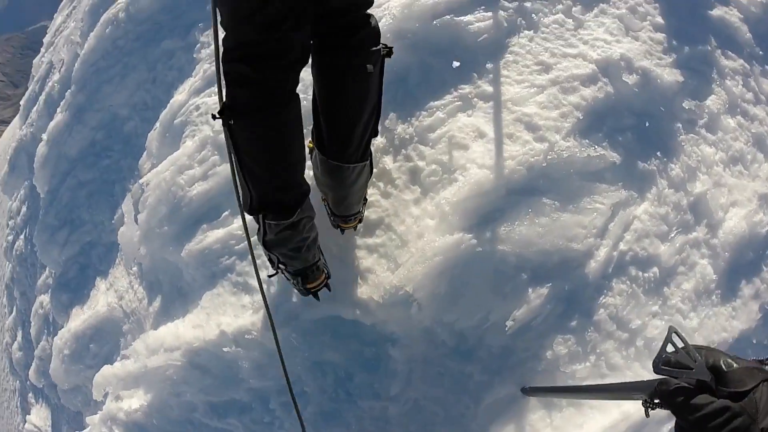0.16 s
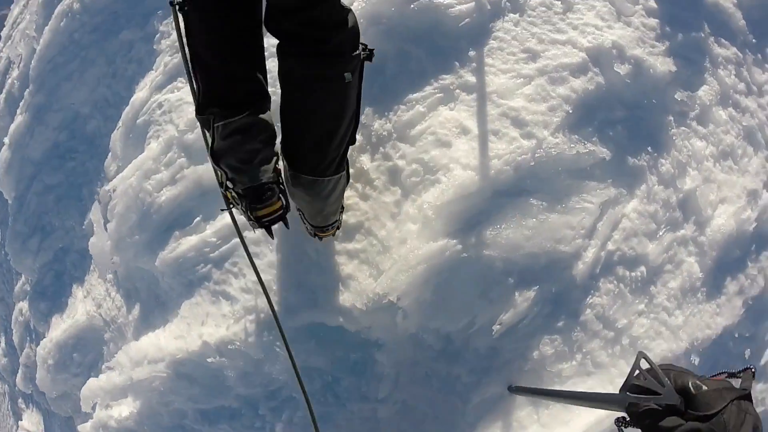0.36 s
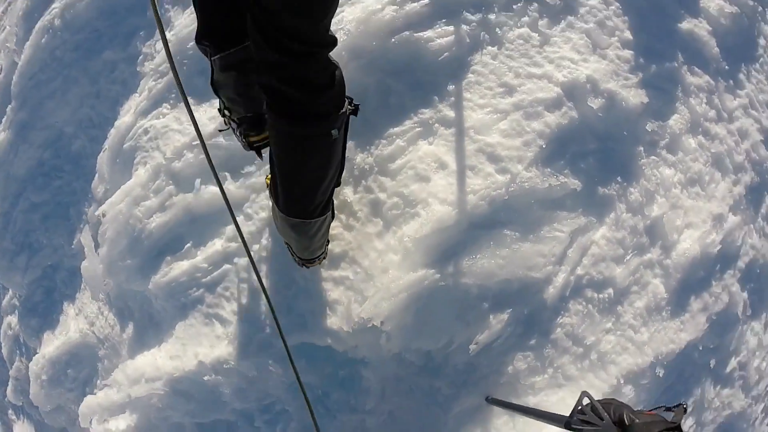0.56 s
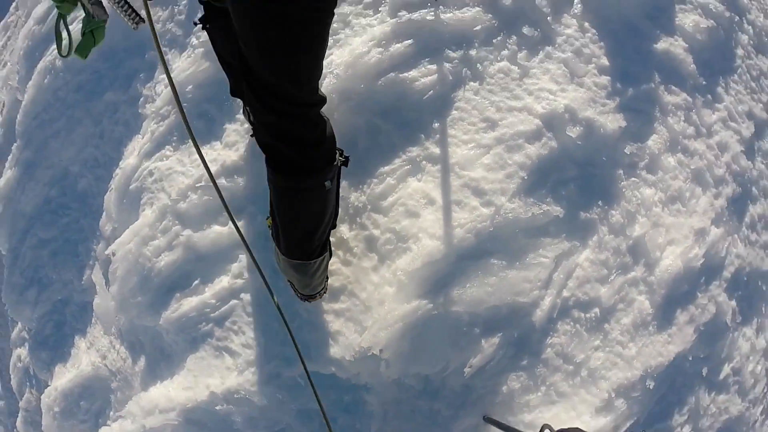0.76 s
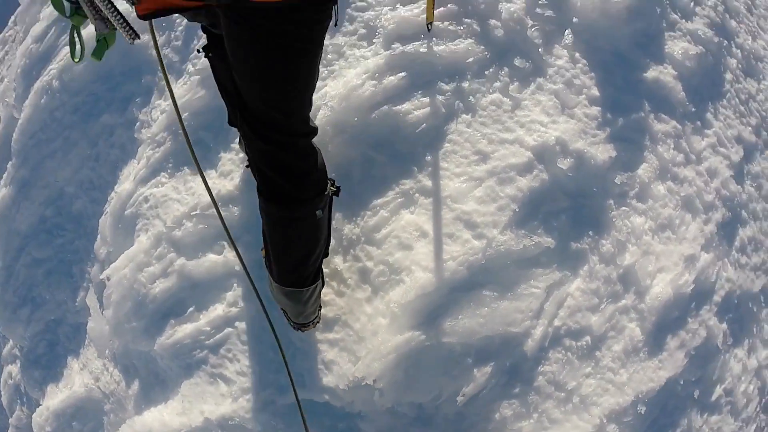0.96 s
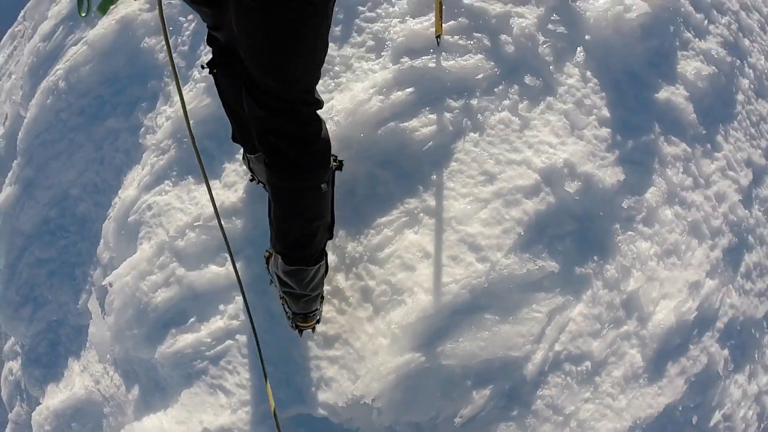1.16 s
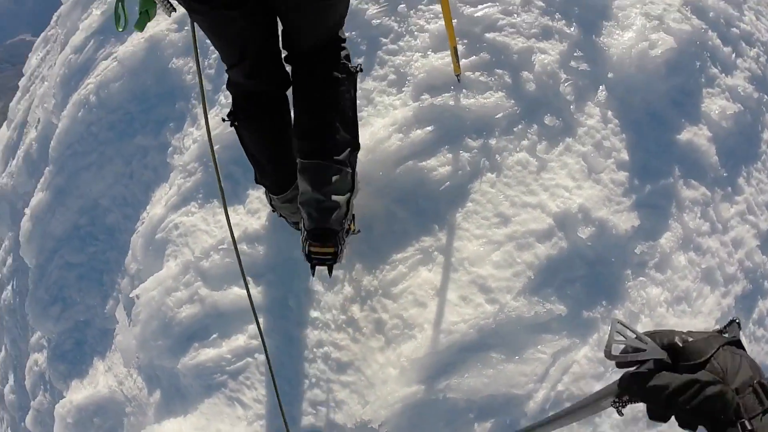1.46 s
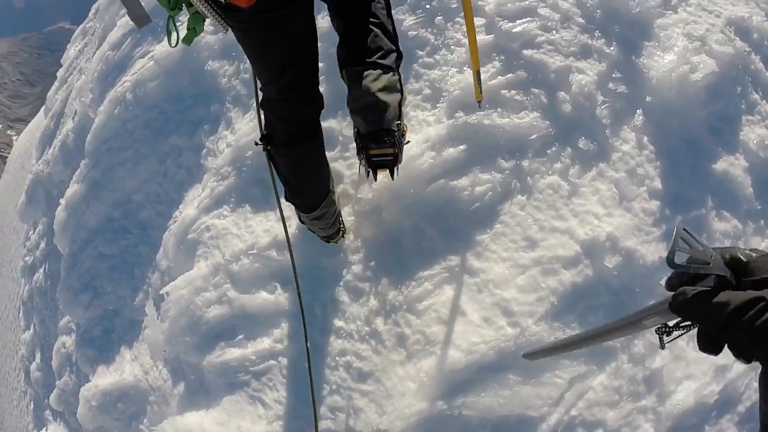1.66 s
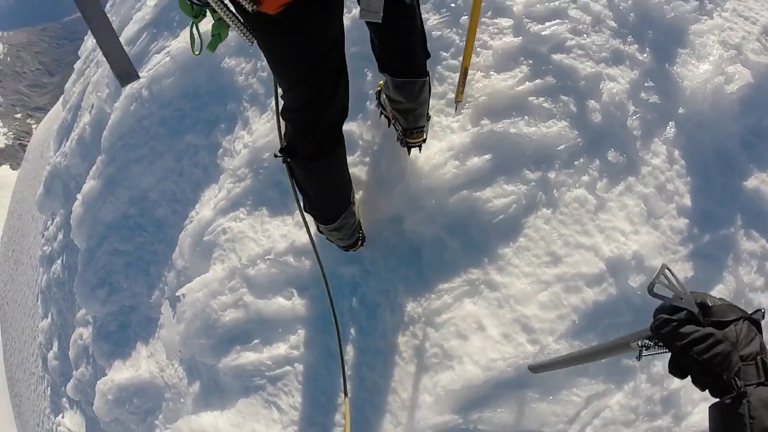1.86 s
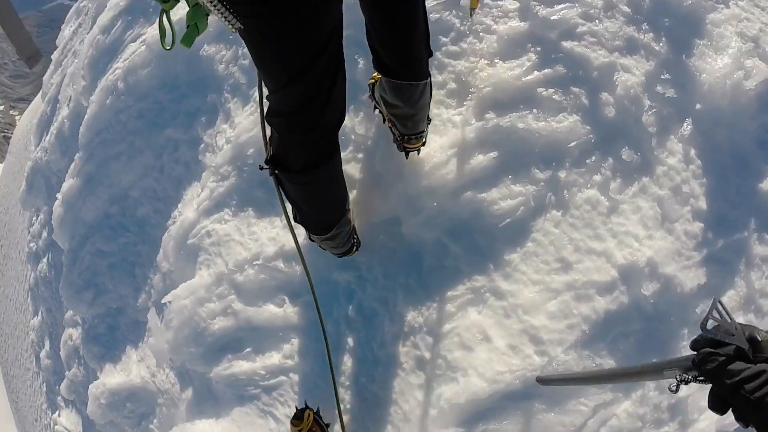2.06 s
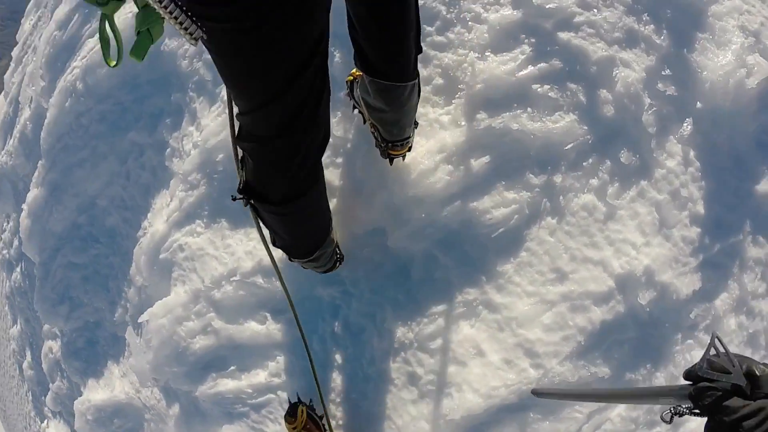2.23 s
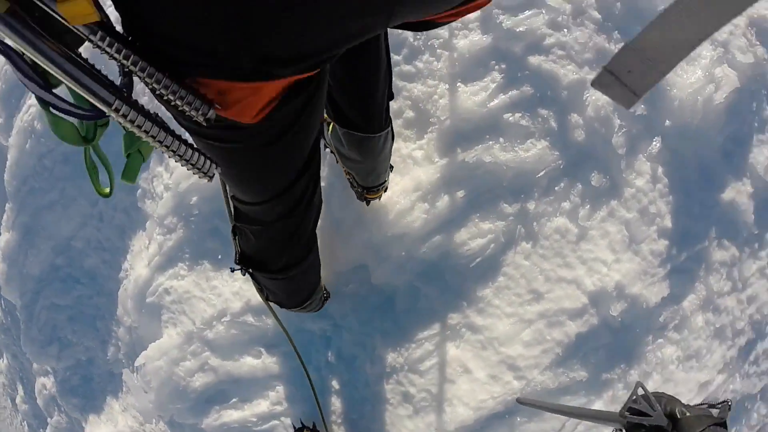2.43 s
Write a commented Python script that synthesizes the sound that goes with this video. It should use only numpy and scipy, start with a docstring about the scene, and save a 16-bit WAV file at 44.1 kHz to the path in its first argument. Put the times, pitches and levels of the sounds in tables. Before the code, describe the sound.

Dense, grainy snow crunches and brittle crust snaps lead, over uneven bassy wind buffets; tiny metal pings come midway, gear clinks near the end, then short rising scrapes. Outdoors and dry, one-channel, from a body-worn microphone in a housing.

```python
"""Crusted snow crushes underfoot in dense grains, at once and then step after step, with sharp snaps of the crust.
Climbers in crampons walk on a windy ridge, heard through a closed camera housing.
Crushes and scrapes are random grain trains, dry or filtered by resonances; snaps are noise bursts with a ring.
Metal gear clinks, knocks and pings as sums of damped modes.
Wind is coloured noise, with low thumps made by a wavering sine under bell-shaped swells."""
import sys
import numpy as np
from scipy import signal
from scipy.fft import rfft, irfft
from scipy.io import wavfile

SR = 44100
rng = np.random.default_rng(int(sys.argv[2]) if len(sys.argv) > 2 else 0)


def to_linear_factor(level_db):
    """Convert decibel levels (scalar or array-like) to linear amplitude factors."""
    exponent = np.asarray(level_db, float) / 20
    return 10 ** exponent


def wrap_up_sound(samples):
    """Save the sound to the file named by the first command line argument, as 16-bit audio."""
    columns = np.atleast_2d(samples).T
    # keep every value between -1 and 1, then stretch to whole-number steps
    tamed = np.clip(columns, -1, 1)
    steps = np.round(tamed * 32767).astype(np.int16)
    wavfile.write(sys.argv[1], SR, steps)


N = 114660  # samples, 2.6 s

# Spectral density of the steady wind: f/Hz, relative level/dB
RUMBLE_SPECTRUM = [(12, 1), (20, -11), (43, 4), (65, -0.5), (80, -2.5), (140, -32), (180, -78), (310, -120)]
# Slow swing of the steady wind: t/s, gain/dB
GUST_SWING = [(0, -5.5), (.7, 4.5), (1.05, -1.5), (1.9, -1), (2.15, -3.5), (2.6, 0)]
RUMBLE_DB, RUMBLE_LUMPY_DB, RUMBLE_LUMP_HZ = -41, 1, 11.0  # level, rms of its drift, drift corner

# Level of the low wind and rustle: t/s, level/dB
RUSTLE_LEVEL = [(0.0, -80), (0.03, -53), (0.17, -62), (0.28, -51), (.47, -52.5), (.52, -46.5), (.56, -51),
                (1.03, -54), (1.09, -58.5), (1.14, -50), (1.17, -59), (1.27, -46), (1.4, -53),
                (2.21, -57.5), (2.24, -51.5), (2.41, -63.5), (2.43, -50.5), (2.57, -51.5), (2.6, -80)]
# Spectral density of the low wind and rustle: f/Hz, relative level/dB
RUSTLE_SPECTRUM = [(71, -44), (120, -1), (151, -8.5), (194, -9), (242, -12), (700, -22.5), (910, -53),
                   (1540, -120)]
RUSTLE_LUMPY_DB, RUSTLE_LUMP_HZ = 2.5, 21.0

# Wind buffets: centre t/s, level/dB, f/Hz, full width at half amplitude/s
BUFFETS = [(.068, -30, 50.4, 0.018), (0.157, -25.5, 50.4, 0.012), (0.199, -30, 47.8, 0.045),
           (0.254, -10, 58.5, 0.031), (.29, -22.5, 57.4, 0.025), (0.322, -14.5, 61.9, 0.036),
           (.374, -5.5, 57, 0.02), (.399, -16.5, 45.8, 0.032), (0.432, -15, 59, 0.036),
           (0.461, -12.5, 59.7, 0.03), (0.536, -24, 53, 0.021), (.585, -34.5, 42.4, 0.021),
           (0.661, -25, 49.7, 0.05), (0.699, -19, 42.8, 0.016), (0.731, -23, 46.7, 0.012),
           (0.814, -27.5, 55, 0.026), (0.855, -19, 57.4, 0.011), (.89, -16, 73.2, 0.044),
           (.915, -18, 66.9, 0.058), (0.943, -10.5, 57, 0.04), (0.989, -20.5, 62, 0.02),
           (1.133, -13, 40.6, 0.027), (1.186, -23.5, 48.3, 0.022), (1.232, -33.5, 50.7, 0.04),
           (1.441, -18, 59.9, 0.027), (1.516, -29, 63.2, 0.04), (1.635, -24, 57.7, 0.024),
           (1.814, -23, 57.7, 0.023), (1.865, -32.5, 51.74, 0.038), (1.948, -32, 44.96, 0.064),
           (2.233, -16.5, 60.05, 0.018), (2.258, -31.5, 67.5, 0.033), (2.299, -22, 63, 0.023),
           (2.321, -22.5, 50, 0.025), (2.369, -24.5, 55.4, 0.014), (2.455, -27, 48.3, 0.022)]
BUFFET_ROUGHNESS, BUFFET_CUT_HZ = 0.26, 98  # noise rms beside a sine of height 1; low-pass edge

# Metal gear knocking: t/s, level/dB
CLINKS = [(1.926, -42.5), (1.942, -44), (1.9632, -32), (1.975, -43.5), (1.994, -38)]
# Modes of the gear: f/Hz, relative level/dB, decay by 60 dB/s
GEAR_MODES = [(1600, -6, .025), (2555, -14, .04), (3012, 0, .095), (3965, -1, .03), (4360, -5, .08),
              (5705, -10, .11), (6590, -13, .03), (8480, -11, .018), (11290, -12, .018)]
GEAR_SCATTER_DB = 1.5
CHATTER_S, CHATTER_PER_S = 0.005, 500  # decay by 1/e, mean rate of the contacts

# Knocks of a metal tube: t/s, level/dB
TUBE_KNOCKS = [(.945, -49), (1.786, -43), (1.843, -54), (1.93, -46), (1.965, -48), (2.06, -54), (2.08, -58),
               (2.125, -54), (2.23, -47), (2.29, -48)]
TUBE_HZ, TUBE_T60_S = 4900, 0.17

# Pings of a small metal ring: t/s, level/dB, f/Hz, level of the upper mode/dB
PINGS = [(0.6037, -52, 8320, -75.5), (0.705, -47.5, 8320, -69), (0.8617, -49, 8390, -57),
         (0.8779, -48, 8660, -48), (1.2854, -50, 8560, -73)]
PING_RATIO, PING_T60_S = 1.365, 0.038  # upper to lower frequency; decay of the lower mode

# Crampon points scraping: start t/s, end t/s, first f/Hz, last f/Hz, level/dB
SCRAPES = [(2.15, 2.229, 1290, 3370, -49.5), (2.27, 2.362, 2870, 3750, -42)]
SCRAPE_WIDTH_HZ, SCRAPE_GRAINS_PER_S = 480, 1100

# Crust crushing under a boot: start t/s, rise/s, hold/s, fall/s, level/dB,
# treble gain/dB, low gain/dB, favoured f/Hz, gain there/dB
CRUSHES = [(0, 0.0013, 0.043, 0.11, -54.5, 3.5, -10, 1570, 8),
           (0.066, 0.0086, 0.02, 0.055, -48.5, -3, -6, 3000, 8),
           (0.099, 0.0076, 0.033, 0.092, -47.5, 4.5, 3.5, 1560, 6.5),
           (0.146, 0.045, 0.11, 0.034, -46, 1.5, 4.5, 1910, 14.5),
           (0.257, 0.054, 0.088, 0.27, -41, -3, 6, 1910, -7),
           (0.388, 0.043, 0.079, 0.19, -44, -1.5, -2, 3200, 14),
           (0.476, 0.034, 0.068, 0.26, -56, -22, 7.5, 1030, 11),
           (0.616, 0.022, 0.087, 0.04, -57.5, 2, 8.5, 4200, 8),
           (0.738, 0.014, 0.03, 0.096, -44, -0.5, 7, 2790, 8.5),
           (0.79, 0.016, 0.033, 0.035, -52.5, 4.5, 2, 4890, 6),
           (0.858, 0.012, 0.11, 0.047, -46.5, -7, -1.5, 2620, -4),
           (0.992, 0.0099, 0.064, 0.047, -49, -1.5, 8, 8380, 0),
           (1.081, 0.0051, 0.029, 0.32, -44, -0.5, 2.5, 3180, 16),
           (1.115, 0.056, 0.082, 0.039, -46.5, -1, 3, 5770, 15.5),
           (1.208, 0.028, 0.042, 0.37, -51.5, -8, 15, 1030, 4),
           (1.367, 0.034, 0.068, 0.18, -49.5, -3, 11, 3300, 13.5),
           (1.546, 0.01, 0.039, 0.12, -50, -0.5, 13, 1600, 10.5),
           (1.618, 0.01, 0.089, 0.036, -66.5, -21, 20.5, 1870, 29),
           (1.771, 0.003, 0.0057, 0.0085, -41.5, -9.5, -7, 8460, 15),
           (1.772, 0.0095, 0.018, 0.0098, -35, -2.5, -8, 2980, 5),
           (1.869, 0.017, 0.012, 0.044, -42, 3, 8, 2750, -1),
           (1.797, 0.0044, 0.022, 0.1, -59.5, -1, 18.5, 1900, 22),
           (1.895, 0.018, 0.094, 0.0098, -52.5, -0.5, -4, 4300, 7.5),
           (2.041, 0.061, 0.03, 0.03, -54.5, 3.5, 16.5, 1030, 1),
           (2.101, 0.034, 0.046, .04, -57.5, 3, 18.5, 1840, 25),
           (2.183, 0.025, 0.015, 0.016, -41.5, 1, 6.5, 2510, 2),
           (2.217, 0.016, 0.059, 0.046, -43, 0, 7.5, 1559, 10),
           (2.254, 0.038, 0.053, 0.093, -46.5, -2.5, -15, 1887, 12),
           (2.398, 0.0024, 0.0046, 0.018, -35.5, -3.5, -20, 3380, -1),
           (2.347, 0.044, 0.071, 0.14, -50.5, 1, 7, 2700, 5.5),
           (2.463, 0.052, 0.12, 0.074, -45.5, -1, 7, 2620, -1)]
CRUSH_RANGE_DB = 28.5  # gained over the rise, lost over the fall
FAVOURED_OCTAVES = 0.13  # standard deviation of the favoured region
CLUMP_DB, CLUMP_HZ = 0.7, 100  # rms of each of two drifts, and their corner
GRAINS_PER_S, GRAIN_SPREAD_DB = 6000, 2.4
HISS_DB, HISS_LOW_DB, HISS_TREBLE_DB = -60.5, 11.5, 0  # far crunch and clothing; gains of its parts

# Spectral density of the dry grains: f/Hz, relative level/dB
CRUST_SPECTRUM = [(290, -10), (500, -13.5), (1030, -6.5), (1190, -10.5), (1880, 1), (2110, -1.5), (3290, 3),
                  (4560, -4.5), (5570, -5.5), (15100, -24.5)]
# Resonances that the grains ring in: f/Hz, bandwidth/Hz, relative level/dB
RESONANCES = [(1030, 100, -16), (1560, 51, -8), (1906, 29, -16), (2297, 41, -16), (2620, 145, -4),
              (3030, 146, -20.5), (3380, 61, -15), (3920, 240, -17.5), (4170, 240, -8), (4913, 59, -10.5),
              (5470, 110, -12.5), (5870, 37, -13.5), (6600, 420, -11.5), (8380, 210, -16),
              (10760, 350, -20.5)]
RINGING_DB, RINGING_PER_S = -3, 450  # common gain of the resonances; grain rate in each

# Snaps of the crust: t/s, level/dB, treble gain/dB, ring f/Hz, ring relative to the level/dB
SNAPS = [(0.076, -28, -2, 3130, -14), (0.1074, -37, 9, 1560, -6), (0.15, -31, 7.5, 2720, -6.5),
         (0.171, -22, 6, 2620, -12), (0.1994, -25.5, 4, 1980, -20), (0.2529, -26.5, 4, 1840, -6),
         (0.2778, -27.5, 5, 1940, -11), (0.3281, -32, 9, 1880, -7), (0.3865, -26, 8.5, 1540, -21),
         (0.459, -27.5, 7.5, 2730, -16), (0.5925, -37, -7, 1920, -6), (0.65, -27.5, -3, 3100, -11.5),
         (0.6648, -28, 0, 2550, -17), (0.6846, -26.5, 0.5, 3540, -12.5), (0.711, -26, -7, 1550, -23),
         (0.8278, -33.5, 7, 3250, -12), (0.8648, -29.5, 5.5, 3280, -15), (0.8806, -31, -7, 1910, -17),
         (0.8944, -27, -4, 1850, -18), (0.9267, -26, -1, 1710, -14.5), (1.007, -29.5, -4, 3300, -17),
         (1.0856, -31, -8, 3150, -10), (1.1757, -30, 4, 2546, -6.5), (1.217, -28, 3, 5600, -4),
         (1.2358, -28, -9, 4120, -9.5), (1.4079, -37, 6, 3380, -4), (1.5551, -31.5, 5, 1650, -10),
         (1.7825, -23.5, 2, 2770, -7), (1.7905, -25.5, -7, 2877, -5.5), (1.8413, -37.5, 9, 3590, -14),
         (1.869, -28.5, 1, 2650, -13), (1.8912, -25, 2, 2720, -3.5), (1.9255, -32, 3, 2995, -16),
         (1.9424, -31, 1, 2960, -8), (1.9636, -28, 5, 3050, -10), (1.992, -26, 3, 3920, -15),
         (2.0994, -40, 10, 3900, -17), (2.1927, -32.5, 5, 2390, -10), (2.3329, -30.5, -5, 3400, -6.5),
         (2.3996, -30, -4, 3500, -21), (2.527, -28.5, 4, 2590, -15)]
SNAP_CREST_DB = 9.5  # allowance for peak over rms
SNAP_ATTACK_S, SNAP_T60_S, SNAP_RING_T60_S = 0.0014, 0.019, 0.051
LOW_HZ, TREBLE_HZ, TOP_HZ = 1460, 4200, 9700  # edges of the spectral parts
SNAP_TOP_DB = -4  # gain of the snaps above TOP_HZ


def rms_one(x):
    """Normalisation: scale to unit root mean square."""
    return x / np.sqrt(np.mean(x ** 2) + 1e-20)


def drift(corner_hz):
    """Low-pass random process: white noise through two equal real poles, rms 1."""
    pole = np.exp(-2 * np.pi * corner_hz / SR)
    noise = rng.standard_normal(N + SR)
    settled = signal.lfilter([1], [1, -2 * pole, pole * pole], noise)[SR:]
    return rms_one(settled)


def colour(x, spectrum):
    """Linear filtering in frequency: weight each component by a table of f/Hz and level/dB, rms 1."""
    hz, db = np.transpose(spectrum)
    f = np.maximum(np.arange(N // 2 + 1) * SR / N, 1)
    gain = to_linear_factor(np.interp(np.log(f), np.log(hz), db))
    return rms_one(irfft(rfft(x) * gain, N))


def butter_filter(x, order, edge_hz, kind="low"):
    """Zero-phase filtering: a Butterworth filter run forwards and backwards."""
    return signal.sosfiltfilt(signal.butter(order, edge_hz, kind, fs=SR, output="sos"), x)


def click_at(s):
    """Unit impulse at one instant in seconds."""
    return 1.0 * (np.arange(N) == int(s * SR))


def ring(clicks, hz, t60):
    """Damped oscillator: a unit impulse starts a decaying sine of initial height 1."""
    r, w = to_linear_factor(-60 / (t60 * SR)), 2 * np.pi * hz / SR
    return signal.lfilter([0, np.sin(w)], [1, -2 * r * np.cos(w), r * r], clicks + 1e-18)


def grains(rate):
    """Random impulse train: independent clicks of uneven size and sign, rms 1."""
    size_db = GRAIN_SPREAD_DB * np.minimum(rng.exponential(1, N), 5)
    sizes = to_linear_factor(size_db) * rng.choice([-1, 1], N)
    return rms_one(sizes * (rng.random(N) < rate / SR))


def chatter(clicks):
    """Repeated contact: each impulse becomes a short dying run of small ones with the same energy."""
    t = np.arange(int(3 * CHATTER_S * SR)) / SR
    out = np.zeros(N + len(t))
    for i in np.flatnonzero(clicks):
        touches = rng.random(len(t)) < CHATTER_PER_S / SR
        run = np.exp(-t / CHATTER_S) * rng.standard_normal(len(t)) * touches
        run[0] = 2  # the first contact
        out[i:i + len(t)] += clicks[i] * run / np.sqrt(np.sum(run ** 2))
    return out[:N]


def wind_rumble():
    """Amplitude-modulated noise: coloured low noise follows the gusts and a faster random drift."""
    t = np.arange(N) / SR
    gust_db = np.interp(t, *np.transpose(GUST_SWING))
    level_db = RUMBLE_DB + gust_db + RUMBLE_LUMPY_DB * drift(RUMBLE_LUMP_HZ)
    return colour(rng.standard_normal(N), RUMBLE_SPECTRUM) * to_linear_factor(level_db)


def wind_rustle():
    """Amplitude-modulated noise: a band of coloured noise follows a level curve and a random drift."""
    t = np.arange(N) / SR
    level_db = np.interp(t, *np.transpose(RUSTLE_LEVEL)) + RUSTLE_LUMPY_DB * drift(RUSTLE_LUMP_HZ)
    return colour(rng.standard_normal(N), RUSTLE_SPECTRUM) * to_linear_factor(level_db)


def wind_buffets():
    """Frequency and amplitude modulation: one wavering sine, roughened by noise, swells at each buffet."""
    t = np.arange(N) / SR
    centres, levels_db, pitches, widths = np.transpose(BUFFETS)
    power = sum(to_linear_factor(2 * db) * np.exp(-4 * np.log(4) * ((t - centre) / width) ** 2)
                for centre, db, width in zip(centres, levels_db, widths))
    cycles = np.cumsum(np.interp(t, centres, pitches)) / SR
    swing = np.sin(2 * np.pi * (cycles + rng.random()))
    band = signal.butter(2, [20, 90], "band", fs=SR, output="sos")
    rough = rms_one(signal.sosfilt(band, rng.standard_normal(N)))
    thumps = np.sqrt(power) * (swing + BUFFET_ROUGHNESS * rough)
    return butter_filter(thumps, 7, BUFFET_CUT_HZ)


def gear_clinks():
    """Modal synthesis: each knock excites every mode of the gear with a strength of its own."""
    times, levels_db = np.transpose(CLINKS)
    out = np.zeros(N)
    scatter_db = GEAR_SCATTER_DB * rng.standard_normal((len(GEAR_MODES), len(times)))
    for (hz, mode_db, t60), own_db in zip(GEAR_MODES, scatter_db):
        clicks = np.zeros(N)
        clicks[(times * SR).astype(int)] = to_linear_factor(levels_db + mode_db + own_db)
        out += ring(chatter(clicks), hz, t60)
    return out


def tube_knocks():
    """Single-mode resonance: chattering knocks set one lightly damped mode ringing."""
    clicks = np.zeros(N)
    for s, db in TUBE_KNOCKS:
        clicks[int(s * SR)] = to_linear_factor(db)
    return ring(chatter(clicks), TUBE_HZ, TUBE_T60_S)


def ring_pings():
    """Inharmonic modes: each impulse excites two modes, the upper one dying sooner."""
    out = np.zeros(N)
    for s, db, hz, upper_db in PINGS:
        click = click_at(s)
        out += to_linear_factor(db) * ring(click, hz, PING_T60_S)
        out += to_linear_factor(upper_db) * ring(click, PING_RATIO * hz, PING_T60_S / PING_RATIO)
    return out


def scrapes():
    """Time-varying resonance: grains ring in a mode that climbs through each stroke."""
    t, out = np.arange(N) / SR, np.zeros(N)
    pole = np.exp(-np.pi * SCRAPE_WIDTH_HZ / SR)
    for start, end, from_hz, to_hz, db in SCRAPES:
        part = np.clip((t - start) / (end - start), 0, 1)
        phase = 2 * np.pi * np.cumsum(from_hz + (to_hz - from_hz) * part) / SR
        # shift the moving resonance to 0 Hz, filter there, and shift back
        shifted = grains(SCRAPE_GRAINS_PER_S) * np.exp(-1j * phase)
        swing = signal.lfilter([1], [1, -pole], shifted) * np.exp(1j * phase)
        swell = np.sin(np.pi * part ** 2) ** 0.5
        out += to_linear_factor(db) * swell * rms_one(swing.imag) * (part < 1)
    return out


def crush_powers():
    """Energy envelope: each crush rises, holds and falls along straight lines in dB."""
    t = np.arange(N) / SR
    knots_db = np.array([-1, 0, 0, -1, -4]) * CRUSH_RANGE_DB
    powers = []
    for start, rise, hold, fall in np.array(CRUSHES)[:, :4]:
        knots_s = np.cumsum([start, rise, hold, fall, fall])
        powers.append(to_linear_factor(2 * np.interp(t, knots_s, knots_db, left=-99)))
    return np.array(powers)


def snap_envelopes():
    """Exponential relaxation: each snap builds up and dies; row 0 without, row 1 with its treble gain."""
    clicks = np.zeros((2, N))
    for s, db, treble_db, _, _ in SNAPS:
        clicks[:, int(s * SR)] = to_linear_factor(db - SNAP_CREST_DB + np.array([0, treble_db]))
    soft = np.exp(-1 / (SNAP_ATTACK_S * SR))
    attack = signal.lfilter([1 - soft], [1, -soft], clicks + 1e-18)
    return signal.lfilter([1], [1, -to_linear_factor(-60 / (SNAP_T60_S * SR))], attack)


def snap_rings():
    """Impulse response: each snap also sets off one damped sine."""
    return sum(to_linear_factor(db + ring_db) * ring(click_at(s), hz, SNAP_RING_T60_S)
               for s, db, _, hz, ring_db in SNAPS)


def footsteps():
    """Source and filter: crushes and snaps set the level of grains, heard dry and through resonances."""
    db, treble_db, low_db, favoured_hz, lift_db = np.transpose(CRUSHES)[4:]
    powers, snaps = crush_powers(), snap_envelopes()
    shared_clumps = drift(CLUMP_HZ)

    def level(hz):
        """Addition of powers: crushes, hiss and snaps at one frequency give an amplitude in time."""
        is_low, is_treble = hz < LOW_HZ, hz > TREBLE_HZ
        octaves = np.log2(hz / favoured_hz)
        lift = lift_db * np.exp(-0.5 * (octaves / FAVOURED_OCTAVES) ** 2)
        crush_db = db + is_low * low_db + is_treble * treble_db + lift
        hiss_db = HISS_DB + is_low * HISS_LOW_DB + is_treble * HISS_TREBLE_DB
        clump_power = to_linear_factor(2 * CLUMP_DB * (shared_clumps + drift(CLUMP_HZ)))
        snap = to_linear_factor(SNAP_TOP_DB * (hz > TOP_HZ)) * snaps[int(is_treble)]
        return np.sqrt((to_linear_factor(2 * crush_db) @ powers + to_linear_factor(2 * hiss_db)) * clump_power + snap ** 2)

    dry_grains = colour(grains(GRAINS_PER_S), CRUST_SPECTRUM)
    low = butter_filter(dry_grains, 2, LOW_HZ)
    treble = butter_filter(dry_grains, 2, TREBLE_HZ, "high")
    top = butter_filter(dry_grains, 2, TOP_HZ, "high")
    out = snap_rings()
    out += level(LOW_HZ / 2) * low
    out += level(np.sqrt(LOW_HZ * TREBLE_HZ)) * (dry_grains - low - treble)
    out += level(TOP_HZ - 1) * (treble - top)
    out += level(TOP_HZ + 1) * top
    for hz, width, mode_db in RESONANCES:
        t60 = np.log(1000) / (np.pi * width)
        evened = np.sqrt(4 * np.pi * width / SR)  # equal rms at any bandwidth
        out += to_linear_factor(RINGING_DB + mode_db) * evened * ring(level(hz) * grains(RINGING_PER_S), hz, t60)
    return out


def scene():
    """Superposition: the pressures of all sources add in one channel."""
    wind = wind_rumble() + wind_rustle() + wind_buffets()
    gear = gear_clinks() + tube_knocks() + ring_pings()
    return (wind + gear + scrapes() + footsteps())[None]


def top_cut(x):
    """Nothing passes above the cut-off."""
    return signal.sosfilt(signal.butter(12, 15260, fs=SR, output="sos"), x)


def record(dry):
    """Transmission: the finished mix passes on at unchanged gain to the last stage."""
    return top_cut(dry)


dry = scene()
out = record(dry)
wrap_up_sound(out)
```